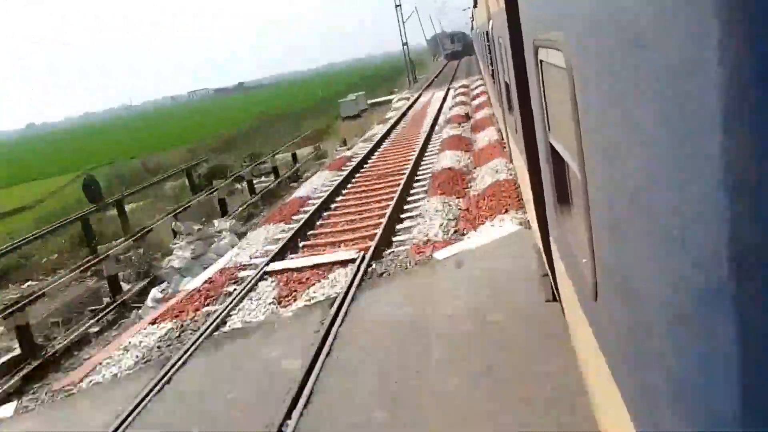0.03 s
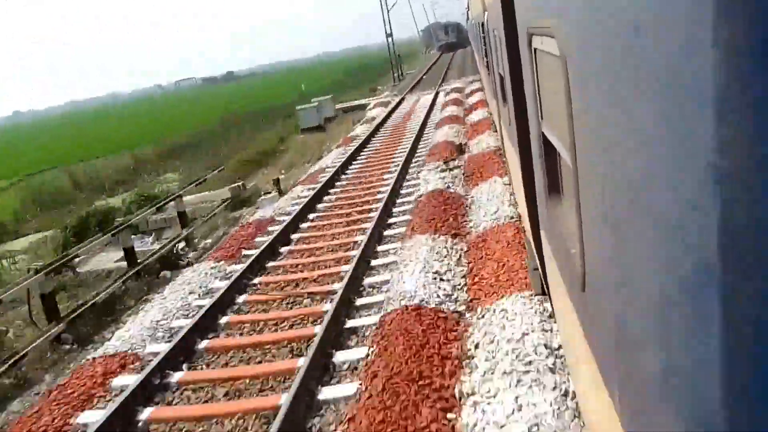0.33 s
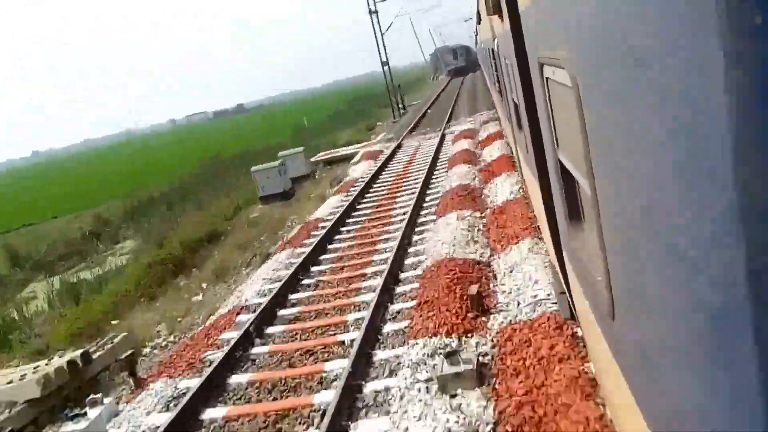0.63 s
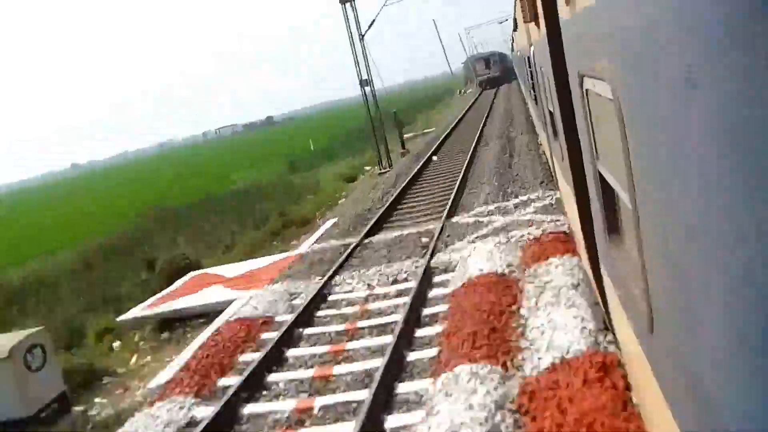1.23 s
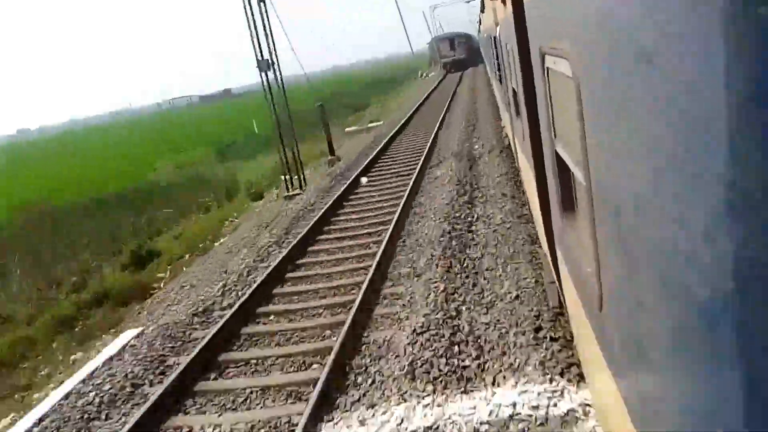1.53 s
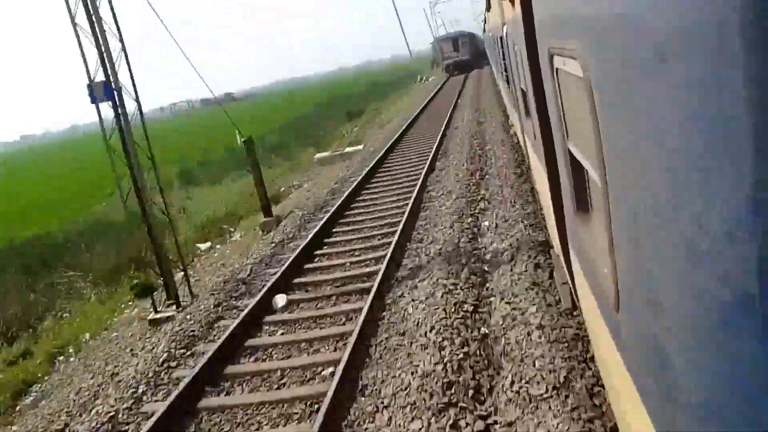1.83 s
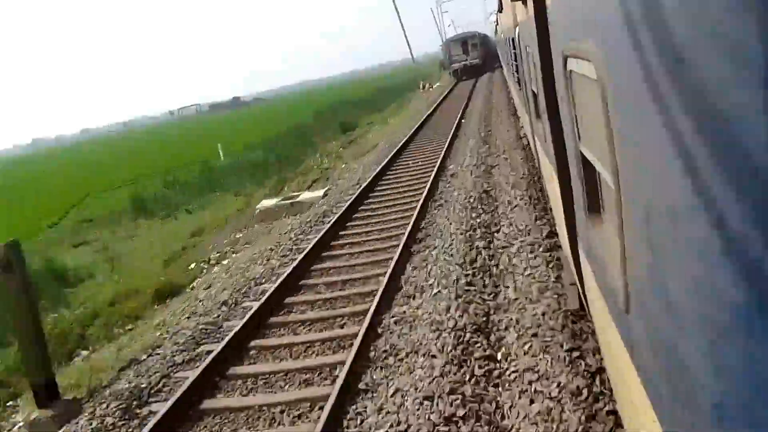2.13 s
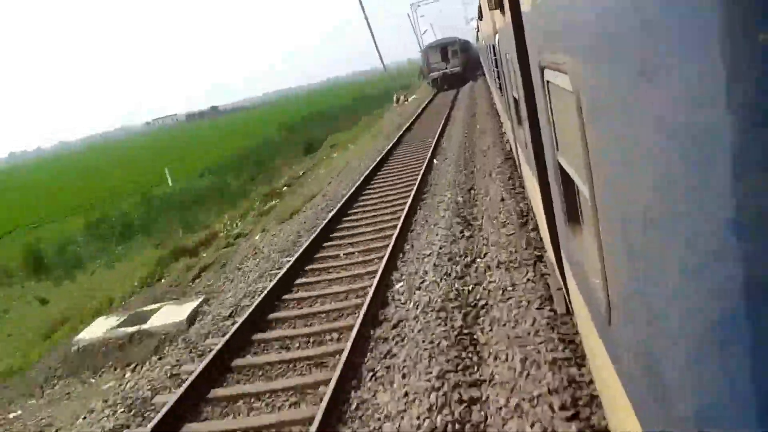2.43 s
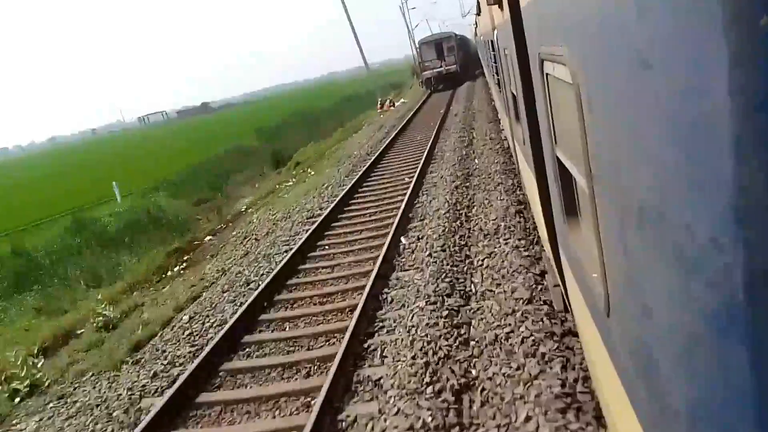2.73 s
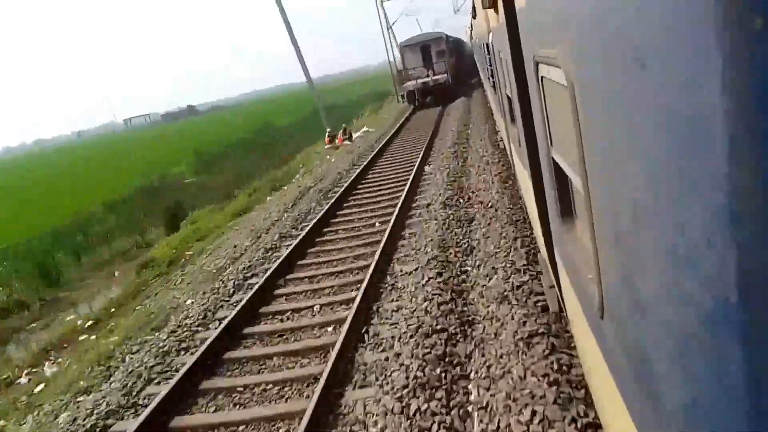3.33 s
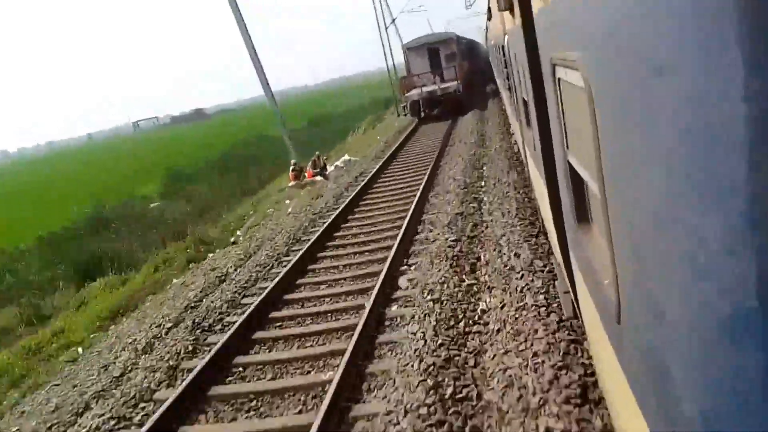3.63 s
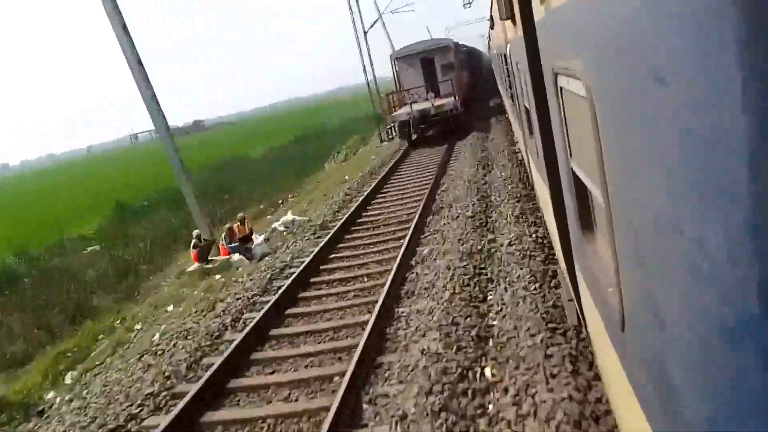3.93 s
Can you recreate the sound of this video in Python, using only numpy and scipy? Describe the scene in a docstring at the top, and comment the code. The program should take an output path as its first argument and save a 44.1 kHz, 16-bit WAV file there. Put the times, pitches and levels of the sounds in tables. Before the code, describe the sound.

Gusting wind rumbles on the microphone over the rolling wheels of a running train.

```python
"""Wind roars on the microphone as you lean out of a moving train in open country.
Its swirls of air, called eddies, rumble, flutter and drone as the wind swells and drops.
Short hard buffets of air, often in clacking pairs, bring dry snaps and overload the microphone.
Underneath, steel wheels roll, ring faintly and hiss on the rails."""
import sys
import numpy as np
from scipy import signal
from scipy.fft import rfft, irfft
from scipy.io import wavfile
from scipy.ndimage import uniform_filter1d

SR = 44100
rng = np.random.default_rng(int(sys.argv[2]) if len(sys.argv) > 2 else 0)


def store_pcm(level_fs):
    """Save levels as 16-bit WAV."""
    pcm = np.round(np.clip(level_fs, -1, 1) * 32767).astype(np.int16)
    wavfile.write(sys.argv[1], SR, np.atleast_2d(pcm).T)


N = 176400
TIME = np.arange(N) / SR

# How strong a sound is as time passes. Each row: time in seconds, level in dB.
WIND_LEVEL = [(0, -14.5), (.09, -10.5), (.14, -16), (.24, -15), (.29, -8.5), (.35, -16), (.5, -11),
              (.6, -15), (.66, -12.5), (.73, -20.5), (.8, -8.5), (.84, -15.5), (1.0, -14), (1.06, -10),
              (1.16, -6), (1.19, -9), (1.25, -5), (1.4, -10), (1.45, -12.5), (1.6, -15.5), (1.69, -7),
              (1.74, -12), (1.81, -13), (1.86, -5), (1.97, -6), (2.06, -12.5), (2.12, -7), (2.21, -14),
              (2.27, -9.5), (2.35, -14), (2.47, -14), (2.56, -19.5), (2.66, -14), (2.85, -13),
              (2.94, -14.5), (2.98, -33), (3.03, -3), (3.12, -16.5), (3.15, -20.5), (3.28, -13.5),
              (3.38, -13), (3.47, -14.5), (3.51, -6), (3.64, -8), (3.73, -8.5), (3.77, -10), (3.82, -13),
              (3.94, -13.5), (4, -22.5)]  # the air rushing past the train
DEEP_LEVEL = [(0, -29.5), (.35, -19), (.7, -25), (1.05, -35), (1.35, -17), (1.6, -20.5), (1.97, -19),
              (2.12, -30), (2.27, -16), (2.5, -32), (3.2, -28), (3.6, -20.5), (4, -26)]  # the wind's deepest rumble
DRONE_LEVEL = [(0, -20), (.3, -21.5), (.68, -34), (.79, -12), (.88, -22), (1.05, -14), (1.35, -18.5),
               (1.55, -23.5), (1.9, -20), (2.12, -14), (2.4, -22.5), (2.58, -32.5), (2.8, -18),
               (3.0, -33.5), (3.35, -24), (3.55, -14.5), (3.8, -17), (4, -24)]  # a hollow drone in the wind
HISS_LEVEL = [(0, -57), (.45, -68), (.95, -55.5), (1.25, -46.5), (1.47, -52.5), (1.65, -49.5),
              (2.35, -49.5), (2.8, -49.5), (3.3, -51), (3.7, -48.5), (4, -47)]  # the thin hiss of the rails

# The tone colour of each noise. Each row: frequency in Hz, relative level in dB.
RUMBLE_SPECTRUM = [(20, -17.5), (40, -6.5), (70, 3), (120, 2), (165, -2), (230, -2), (310, -6.5),
                   (500, -14), (800, -24.5), (1600, -54)]  # large eddies
FLUTTER_SPECTRUM = [(120, -16), (300, 5), (550, -7.5), (900, -9.5), (1350, -10), (1700, -29), (2500, -28),
                    (5000, -45)]  # small eddies
DEEP_SPECTRUM = [(18, -13), (40, 14), (65, -5.5), (110, -30.5)]  # the deepest rumble
THUMP_SPECTRUM = [(30, -0.5), (120, 11), (300, 2), (600, -8), (1000, -36), (2000, -29)]  # the low part of a buffet
CRACK_SPECTRUM = [(200, 9), (550, 6), (950, 0), (1400, 4), (1800, -18.5), (2800, -27), (4500, -33),
                  (9000, -43.5)]  # the bright part of a buffet
SNAP_SPECTRUM = [(150, 1.5), (500, 11), (1300, 3.5), (2000, -11.5), (3200, -15), (5000, -26.5), (8000, -31),
                 (15000, -46)]  # a dry snap
ROLL_SPECTRUM = [(40, -8), (130, -2), (400, -7), (700, -14), (1300, -19), (2000, -22.5), (2600, -29.5),
                 (3400, -30), (4500, -33.5), (5600, -39.5), (7200, -43), (8500, -45), (10000, -61),
                 (16000, -75)]  # wheels rolling
HISS_SPECTRUM = [(3000, -16.5), (5500, -8), (6800, 0), (7150, 2.5), (7500, -2), (8300, -5), (9800, -12.5),
                 (12300, -7.5), (14000, -9.5), (16000, -10.5)]  # rails hissing
BRUSH_SPECTRUM = [(1500, -18), (3000, 2), (4600, -2.5), (6000, -8), (8300, -7.5), (10000, -31),
                  (16000, -37)]  # a wheel's flange (its guiding lip) brushing the rail
GRIND_SPECTRUM = [(700, -18), (1200, -8), (1650, 3), (2000, -13), (3000, -22), (4500, -30)]  # wheels grinding

# Hard hits of air. Each row: start in seconds, length in seconds, thump in dB, crack in dB.
BUFFET_HITS = [(0.111, 0.011, -33, -28), (0.177, 0.031, -16, -18), (0.301, 0.012, -14, -30),
               (0.433, 0.009, -10, -20), (0.52, 0.045, -4, -11.5), (0.584, 0.016, -8, -13),
               (0.601, 0.017, -12, -26), (0.748, 0.031, -7, -22.5), (0.8, 0.014, -4.5, -23),
               (1.096, 0.0068, -0.5, -7), (1.133, 0.026, -4.5, -23.5), (1.235, 0.0087, -11, -29),
               (1.289, 0.029, -15.5, -16), (1.395, 0.019, -6.5, -20.5), (1.561, 0.0053, -11.5, -19),
               (1.647, 0.03, -25, -12), (1.683, 0.025, -12, -15.5), (1.76, 0.03, -3.5, -11),
               (1.866, 0.0035, -5, -20), (2.102, 0.063, -9.5, -18.5), (2.246, 0.014, -11, -19.5),
               (2.288, 0.011, -11.5, -19), (2.423, 0.0073, -8.5, -23), (2.903, 0.0041, -20, -17),
               (3.013, 0.025, -3, -19), (3.051, 0.044, -9.5, -14.5), (3.110, 0.026, -3.5, -10),
               (3.301, 0.0093, -26, -27), (3.434, 0.012, -24, -16.5), (3.481, 0.015, 4.5, -9),
               (3.543, .012, -33, -15.5), (3.594, 0.0262, -4.5, -14), (3.644, 0.0063, -4.5, -21),
               (3.695, 0.012, -8, -17.5), (3.739, 0.0095, -6.5, -13.5), (3.838, 0.011, -7, -41),
               (3.948, 0.0044, -6, -22)]
# Dry snaps, mostly at the crests of the buffets. Each row: start in seconds, strength in dB.
SNAP_HITS = [(0.1035, -7), (.1965, -7.5), (.517, -6.5), (.5926, -6), (0.6028, -3.5), (1.1, -18),
             (1.3959, -5), (1.6694, -4.5), (1.7, -9), (1.7616, -3.5), (1.7725, -1), (1.784, -8),
             (1.7891, -2), (2.904, -16), (3.051, -5), (3.0728, -5), (3.111, -5), (3.1283, 2), (3.313, -11),
             (3.439, -11.5), (3.488, -7.5), (3.6127, -6.5), (3.621, -6.5), (3.6525, -3), (3.738, 0.5)]
# Notes at which wheels and rails ring. Each row: pitch in Hz, band width in Hz, level in dB.
STEEL_RINGS = [(1290, 150, -40.5), (1970, 140, -46), (2230, 180, -50), (3043, 120, -55), (3290, 110, -55.5),
               (3630, 100, -56), (4650, 170, -64)]
# A flange brushes the rail. Each row: peak time in seconds, width in seconds, level in dB.
FLANGE_BRUSHES = [(.625, .035, -37), (1.3, 0.018, -41), (2.13, 0.026, -43), (2.66, 0.024, -41),
                  (3.95, 0.024, -42.5)]


def slipstream():
    """Air rushes over the microphone: large eddies rumble and small ones flutter."""
    gust_db = in_time(WIND_LEVEL) + 12.5  # how far the wind is above its average
    eddies = drift(rate=40)
    rumble_db = -15 + 1.21 * gust_db + 4 * eddies
    rumble = steadied(noise(RUMBLE_SPECTRUM), span_s=.025) * from_db(rumble_db)
    rough_air = noise(FLUTTER_SPECTRUM) * from_db(2.5 * eddies)
    flutter = steadied(rough_air, span_s=0.19) * from_db(-23.5 + 1.1 * gust_db)
    deep = steadied(noise(DEEP_SPECTRUM), span_s=0.044) * from_db(in_time(DEEP_LEVEL))
    return rumble + flutter + deep


def buffets():
    """Each hit of air sets in fast, holds and collapses: a low thump with a ragged crack on top."""
    attack_s, release_s = 0.002, 0.0043
    thump_gain, crack_gain = np.zeros(N), np.zeros(N)
    for start, length, thump_db, crack_db in BUFFET_HITS:
        age = TIME - start
        rise = np.clip(age / attack_s + .5, 0, 1)
        fall = np.exp(-np.maximum(age - length, 0) / release_s)
        thump_gain += from_db(thump_db) * rise * fall
        crack_gain += from_db(crack_db) * rise * fall
    thump = thump_gain * steadied(noise(THUMP_SPECTRUM), span_s=0.0052)
    crack = crack_gain * noise(CRACK_SPECTRUM)
    raggedness = from_db(2.82 * drift(rate=120))
    return thump + crack * raggedness


def snaps():
    """Sudden bright bursts of noise die away within a few milliseconds."""
    rise_s, hold_s, decay_s = 0.0055, 0.0015, 0.0016
    gain = np.zeros(N)
    for start, db in SNAP_HITS:
        age = TIME - start
        rise = np.sin(np.pi / 2 * np.clip(age / rise_s + .5, 0, 1)) ** 2
        fall = np.exp(-np.maximum(age - hold_s, 0) / decay_s)
        gain += from_db(db) * rise * fall
    return gain * steadied(noise(SNAP_SPECTRUM), span_s=0.0023)


def wind_drone():
    """Eddies peel off at a loosely regular rate and make a hollow, low note that wanders."""
    centre_hz, blur_hz = 164.8, 9.6
    pitch_hz = centre_hz * np.exp(.14 * drift(rate=3.973))  # wanders by about 14 percent
    phase = 2 * np.pi * np.cumsum(pitch_hz) / SR
    # Two random wobbles blur the pure note into a narrow band of noise.
    band = drift(blur_hz) * np.cos(phase) + drift(blur_hz) * np.sin(phase)
    return steadied(band, span_s=0.12) * from_db(in_time(DRONE_LEVEL))


def rolling_wheels():
    """Steel wheels roll on the rails with a nearly steady roar."""
    return noise(ROLL_SPECTRUM) * from_db(-24.5 + 0.72 * drift(rate=24))


def ringing_steel():
    """Rough steel keeps wheel and rail ringing; each note swells and fades by itself."""
    rings = np.zeros(N)
    for hz, width_hz, db in STEEL_RINGS:
        band = signal.butter(2, [hz - width_hz / 2, hz + width_hz / 2], "band", fs=SR, output="sos")
        ring = signal.sosfilt(band, rng.standard_normal(N))
        waver = from_db(1.8 * drift(rate=3.6))
        rings += from_db(db) * rms_one(ring * waver)
    return rings


def rail_hiss():
    """The rails hiss thinly, flanges brush them now and then, and the wheels grind once."""
    grind = from_db(-32) * swell(peak_s=.47, width_s=0.054) * noise(GRIND_SPECTRUM)
    hiss = noise(HISS_SPECTRUM) * from_db(in_time(HISS_LEVEL))
    brush_gain = sum(from_db(db) * swell(peak, width) for peak, width, db in FLANGE_BRUSHES)
    return hiss + noise(BRUSH_SPECTRUM) * brush_gain + grind


def from_db(db):
    """Turn decibels into a gain, the number a sound is multiplied by."""
    return 10 ** (np.asarray(db) / 20)


def rms_one(x):
    """Scale a signal so that its average power is 1."""
    return x / np.sqrt(np.mean(x ** 2) + 1e-20)


def in_time(rows):
    """Join (time, value) points with straight lines."""
    return np.interp(TIME, *np.transpose(rows))


def noise(spectrum):
    """Noise of power 1 with the given tone colour, fading beyond both ends of the table."""
    hz, db = np.transpose(spectrum)
    freqs = np.maximum(np.arange(N // 2 + 1) * SR / N, 1)
    colour = from_db(np.interp(np.log(freqs), np.log(hz), db))
    edges = np.minimum(freqs / hz[0], 1) * np.minimum(hz[-1] / freqs, 1) ** 2
    return rms_one(irfft(rfft(rng.standard_normal(N)) * colour * edges, N))


def drift(rate):
    """A smooth random wobble, about 1 in size, that changes about rate times a second."""
    freqs = np.arange(N // 2 + 1) * SR / N
    return rms_one(irfft(rfft(rng.standard_normal(N)) / (1 + (freqs / rate) ** 2), N))


def steadied(x, span_s):
    """Even out swings in loudness that are slower than about span_s seconds."""
    size = max(int(span_s * SR), 2)
    local_power = uniform_filter1d(uniform_filter1d(x ** 2, size), size)
    return x / np.sqrt(local_power + 1e-9)


def swell(peak_s, width_s):
    """A bell-shaped rise and fall."""
    return np.exp(-.5 * ((TIME - peak_s) / width_s) ** 2)


def scene():
    """Wind and wheels add up at one microphone."""
    wind = slipstream() + wind_drone() + buffets() + snaps()
    wheels = rolling_wheels() + ringing_steel() + rail_hiss()
    return (wind + wheels)[None]


def record(dry):
    """The overloaded microphone flattens loud peaks, dulls the treble and cuts the very top."""
    ceiling, hardness = 0.71, 5
    treble_hz, treble_share, cutoff_hz = 2350, 0.27, 15800
    clipped = dry / (1 + np.abs(dry / ceiling) ** hardness) ** (1 / hardness)
    lows = signal.sosfilt(signal.butter(1, treble_hz, fs=SR, output="sos"), clipped)
    dulled = lows + treble_share * (clipped - lows)
    return signal.sosfilt(signal.ellip(10, .1, 90, cutoff_hz, fs=SR, output="sos"), dulled)


dry = scene()
out = record(dry)
store_pcm(out)
```